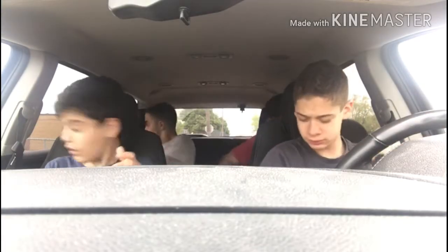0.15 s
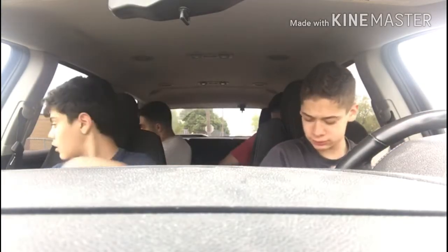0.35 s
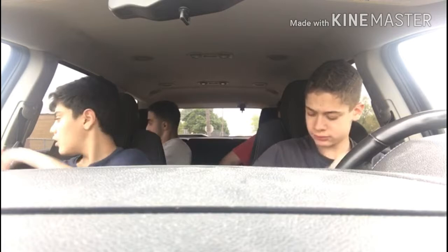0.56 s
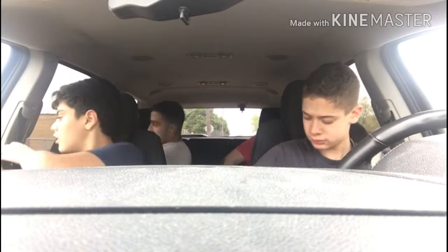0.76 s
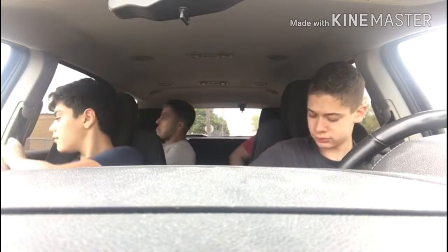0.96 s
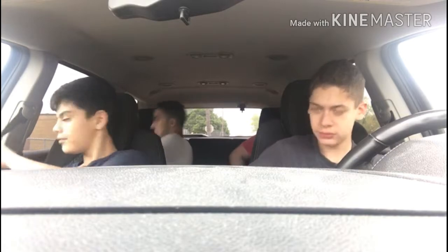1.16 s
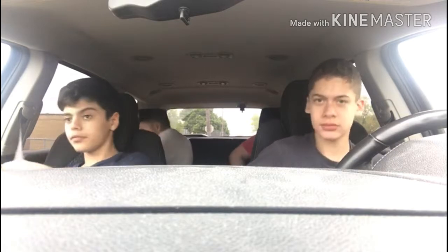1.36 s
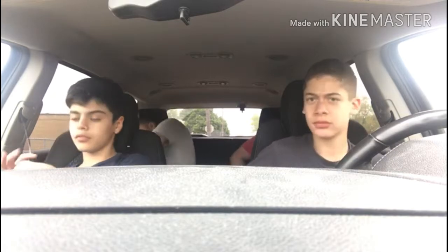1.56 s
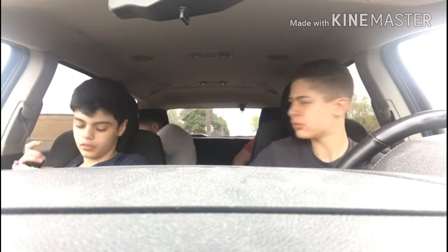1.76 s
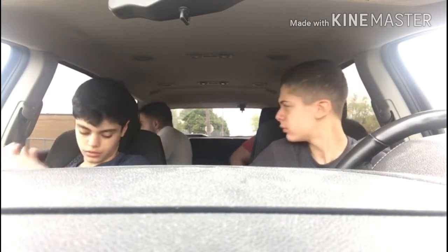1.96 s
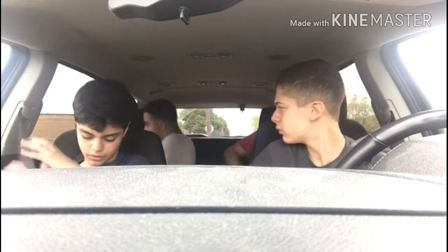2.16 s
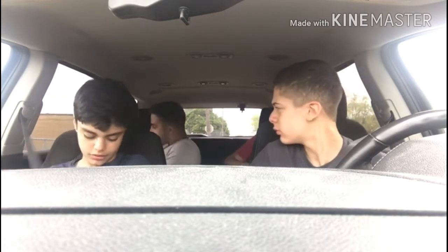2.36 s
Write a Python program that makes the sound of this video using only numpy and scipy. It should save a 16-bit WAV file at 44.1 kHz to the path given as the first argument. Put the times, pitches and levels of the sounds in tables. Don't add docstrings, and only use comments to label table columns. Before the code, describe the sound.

Soft blows on seats, door and trim thud inside a closed parked car, each followed by a low cabin boom; plastic taps, buckle ticks and a brief belt-reel creak cluster around them over faint traffic hum.

```python
import sys
import numpy as np
from scipy import signal
from scipy.fft import rfft, irfft, next_fast_len
from scipy.io import wavfile
from scipy.ndimage import map_coordinates

SR = 44100
rng = np.random.default_rng(int(sys.argv[2]) if len(sys.argv) > 2 else 0)


def nominal_scale(level):
    x = np.asarray(level, float) / 20
    return 10 ** x


def int16_out(signal):
    q = np.round(np.clip(np.atleast_2d(signal).T, -1, 1) * 32767)
    wavfile.write(sys.argv[1], SR, q.astype(np.int16))


N = 112455


def unit(x):
    return x / np.sqrt(np.mean(x ** 2) + 1e-20)


def noise(points, size):
    hz, db = np.transpose(points)
    m = next_fast_len(size + 8192)
    bins_hz = np.fft.rfftfreq(m, 1 / SR)
    gain = nominal_scale(np.interp(np.log(bins_hz + 1), np.log(hz + 1), db, left=-120, right=-120))
    return unit(irfft(rfft(rng.standard_normal(m)) * gain, m)[:size])


def around(hz, octaves):
    return [(hz * 2 ** (k * octaves), -7 * k * k) for k in range(-2, 3)]


def wobble(knots_per_s, size):
    knots = rng.standard_normal(size // 100 + 4)
    return map_coordinates(knots, [np.arange(size) * knots_per_s / SR])


def shape(t, rise_s, hold_s, t60_s):
    attack = (1 - np.exp(-t / rise_s)) ** 2
    return attack * nominal_scale(-60 * np.maximum(t - hold_s, 0) / t60_s)


def add(track, s, x):
    track[round(s * SR):][:len(x)] += x


# (time [s], level [dB])
TRAFFIC_LEVEL = [
    (0.0, -37.5),
    (0.5, -38),
    (0.97, -37.5),
    (1.3, -37),
    (1.45, -38.5),
    (1.73, -38),
    (2.02, -36.5),
    (2.55, -36),
]
# (frequency [Hz], density [dB per Hz])
RUMBLE_SPECTRUM = [(15, -61), (25, -3), (45, -1), (102, -4), (227, -13.5), (273, -11.5), (390, -16.5),
                   (462, -16.5), (581, -15.5), (750, -44.5), (980, -71), (1650, -120)]
HUM_SPECTRUM = [(410, -47.5), (700, -11.5), (780, -9), (845, 0), (1000, 0), (1090, -17), (1280, -15.5),
                (1680, -22), (2370, -22), (3200, -41.5), (4160, -67), (7040, -120)]
HISS_SPECTRUM = [(1650, -13), (2800, -0.5), (4210, -1.5), (4690, -5), (5530, -3), (7910, -6.5), (9090, -6),
                 (11200, -10.5), (12000, -13), (12200, -31), (15400, -33), (15600, -90)]
HUM_DB, HISS_DB, SWELL_DB = -54.5, -70.5, 1.5


def traffic():
    level_db = np.interp(np.arange(N) / SR, *np.transpose(TRAFFIC_LEVEL))
    rumble_db = level_db + SWELL_DB * wobble(10.21, N)
    hum_db = HUM_DB + 0.62 * (level_db - level_db.mean()) + 0.37 * wobble(6, N)
    hiss_db = HISS_DB + 0.37 * wobble(8.9, N)
    rumble = nominal_scale(rumble_db) * noise(RUMBLE_SPECTRUM, N)
    hum = nominal_scale(hum_db) * noise(HUM_SPECTRUM, N)
    hiss = nominal_scale(hiss_db) * noise(HISS_SPECTRUM, N)
    return rumble + hum + hiss


# (time [s], level [dB])
CREAK_LEVEL = [
    (1.05, -88),
    (1.075, -46),
    (1.09, -55),
    (1.105, -51),
    (1.12, -46),
    (1.145, -39),
    (1.174, -42.5),
    (1.187, -50),
    (1.2, -80),
]
# (frequency [Hz], width [Hz], level [dB])
REEL_MODES = [(970, 50, -4), (1430, 35, -11), (1853, 78, -2), (2130, 100, -5.5), (2430, 74, -8.5),
              (2830, 40, -13.5)]
SLIPS_PER_S, SLIP_SCATTER_DB = 2600, 2
REEL_TOP_HZ = 3000


def creak():
    t = np.arange(N) / SR
    happens = rng.random(N) < SLIPS_PER_S / SR
    scatter = nominal_scale(SLIP_SCATTER_DB * rng.standard_normal(N))
    level = nominal_scale(np.interp(t, *np.transpose(CREAK_LEVEL), left=-120, right=-120))
    slips = happens * scatter * level

    f = np.fft.rfftfreq(2 * N, 1 / SR)
    body = 0
    for k, (hz, width_hz, db) in enumerate(REEL_MODES):
        damping = 1j * f * width_hz
        body = body + (-1) ** k * nominal_scale(db) * damping / (hz * hz - f * f + damping)
    body = body / (1 + (f / REEL_TOP_HZ) ** 4)
    return 19 * irfft(rfft(slips, 2 * N) * body, 2 * N)[:N]


# (time [s], level [dB], centre [Hz], length [s])
TICK_EVENTS = [(.524, -56, 2000, .01), (.559, -62, 2450, .003), (.607, -65, 2400, .003),
               (1.055, -54, 1800, .008), (1.069, -53, 2400, .004), (1.097, -48, 2100, .006),
               (1.099, -65, 5400, .002), (1.071, -68, 4500, .002), (1.789, -52, 1800, .008),
               (1.84, -66, 2400, .01), (0.459, -69, 2300, 0.057), (2.085, -62.5, 2240, 0.0085),
               (1.259, -55.5, 1850, 0.013), (1.41, -60, 2500, 0.0067), (1.588, -56, 1940, 0.0052),
               (1.607, -66, 2500, 0.026), (1.683, -51, 1670, 0.015), (1.745, -55, 2700, 0.002),
               (1.745, -53, 1280, 0.008), (1.74, -63, 6500, 0.012), (1.716, -55, 1100, 0.011),
               (1.679, -64.5, 6370, .004), (2.156, -48, 1200, 0.015), (2.158, -50, 2070, 0.0061),
               (2.16, -75, 4180, 0.0079), (2.282, -59, 2400, 0.0079), (2.282, -63.5, 6000, 0.0038),
               (2.311, -50, 1490, 0.0038)]
TICK_OCTAVES, TICK_T60_S = 0.62, 0.049


def ticks():
    out, t = np.zeros(N + SR), np.arange(SR // 8) / SR
    for s, db, hz, length_s in TICK_EVENTS:
        scrape = noise(around(hz, TICK_OCTAVES), len(t))
        add(out, s, nominal_scale(db) * scrape * shape(t, 0.003, length_s, TICK_T60_S))
    return out[:N]


# (time [s], level [dB], pitch [Hz], contact [s]) further knocks, of the same kind as the plastic
FURTHER_KNOCKS = [
    (.02, -39, 560, .012),
    (.391, -37, 585, .016),
    (.481, -43, 560, .005),
    (.736, -36, 545, .014),
    (2.263, -39, 600, .012),
    (.855, -57, 1280, .016),
    (1.136, -41, 965, .016),
    (1.16, -46, 960, .008),
    (1.62, -63, 2750, .012),
    (1.783, -30, 210, .01),
]
BUCKLE_PINGS = [(.525, -63, 4250, .004), (0.631, -61, 1920, 0.0053), (1.344, -64.5, 4560, 0.0026),
                (1.424, -57.5, 1890, 0.0052), (1.749, -48.5, 1289, 0.017), (1.747, -55, 2700, .004),
                (1.747, -61.5, 4500, .006), (1.792, -67, 4390, .005), (1.997, -60, 1980, 0.0058),
                (1.997, -70.5, 4300, .005), (2.157, -62, 4050, 0.0093), (2.16, -65, 2625, 0.019),
                (2.065, -61.5, 1850, 0.01), (2.286, -62, 2450, .008)]
PLASTIC_TAPS = [(.535, -29, 150, .04), (1.07, -27, 150, .05), (1.8, -28, 145, .045), (.205, -24, 140, .03),
                (1.822, -30, 480, .018), (1.115, -40, 700, .02), (.548, -25, 520, 0.014),
                (.529, -25, 480, 0.012), (.262, -34, 568, 0.0092), (0.31, -29, 92.6, 0.016),
                (0.2545, -14.5, 135, 0.012), (0.42, -32, 62, 0.02), (1.67, -35, 55, .04),
                (2.151, -34, 336, 0.018), (1.105, -23, 537, 0.0082), (1.262, -24.5, 306, 0.017),
                (1.266, -29, 500, 0.014), (1.3, -39, 600, 0.024), (1.593, -40, 460, 0.0033),
                (1.692, -29.5, 550, 0.017), (1.763, -37, 570, 0.004), (.192, -36, 800, 0.006),
                (1.135, -35, 280, 0.04), (1.304, -33, 220, 0.021), (1.165, -30, 62, 0.035),
                (1.068, -20, 300.5, 0.015), (2.05, -25.5, 58, 0.014), (1.058, -26, 480, 0.024),
                (1.968, -36.5, 567, 0.0045), (2.151, -32, 555, 0.032), (2.172, -21.5, 54, 0.014)]
RATTLE_DB, RATTLE_OCTAVES = -6, 0.36
PARTNER_RATIO, PARTNER_DB = .9, -13
TAP_WANDER_RAD, TAP_RISE_CYCLES = .6, 0.7
TAP_T60_CYCLES, SHORTEST_T60_S, LONGEST_T60_S = 12, .03, 0.073


def taps():
    out, t = np.zeros(N + SR), np.arange(SR // 2) / SR
    for s, db, hz, contact_s in PLASTIC_TAPS + BUCKLE_PINGS + FURTHER_KNOCKS:
        phase = 2 * np.pi * hz * t
        main = np.sin(phase + TAP_WANDER_RAD * wobble(90, len(t)))
        partner = nominal_scale(PARTNER_DB) * np.sin(phase * PARTNER_RATIO)
        rattle = nominal_scale(RATTLE_DB) * noise(around(hz, RATTLE_OCTAVES), len(t))
        t60_s = np.clip(TAP_T60_CYCLES / hz, SHORTEST_T60_S, LONGEST_T60_S)
        envelope = shape(t, TAP_RISE_CYCLES / hz, contact_s, t60_s)
        add(out, s, nominal_scale(db) * (main + partner + rattle) * envelope)
    return out[:N]


BOOM_RISE_S = 0.017


def air_swell(t, hz, crest_s, t60_s):
    after_s = t - crest_s
    rise = np.exp(-(after_s / BOOM_RISE_S) ** 2 / 2) * np.minimum(t / .005, 1)
    envelope = np.where(t < crest_s, rise, nominal_scale(-60 * after_s / t60_s))
    return np.cos(2 * np.pi * hz * after_s) * envelope


# (time [s], knock [dB], boom [dB], slap [dB])
BLOWS = [
    (0.188, -13.5, -12.5, -40.5),
    (.5205, -20.5, -40, -46),
    (.5255, -25, -14, -44),
    (1.0559, -19, -15.5, -43),
    (1.0849, -20, -37, -44),
    (1.3424, -16, -14, -43),
    (1.7928, -20, -13, -44.5),
    (1.9942, -19.5, -16.5, -46.5),
    (2.2162, -19, -19.5, -50.5),
]
BLOW_SPOTS = ["seat", "door", "door", "trim", "sill", "seat", "pillar", "seat", "cushion"]
SPOT_PUSHES = {"seat": [-.95, -.7, 1.05, -.55, -.7, -1.1, -.55, -.3, .12], "cushion": [-1.1, -.7, 1, -.55,
               -.4, -.55, -.3, -.1, .1], "door": [-.25, -1, .5, .25, -.4, .5, -.5, .15, 0], "trim": [-1.1,
               -.8, .4, -.8, -1, -.65, -.1, -.35, -.1], "sill": [.2, .3, .4, -1, -.3, -.6, .2, .2, 0],
               "pillar": [1.2, .8, -.3, .5, .7, .5, -.2, -.2, .1]}
# (frequency [Hz], t60 [s])
PANEL_MODES = [(183, .025), (211, .078), (240.4, .18), (288, .058), (351, .086), (395, .025), (442.5, .084),
               (537, .092), (603, .025)]
# (frequency [Hz], density [dB per Hz])
TAIL_SPECTRUM = [(100, -31.5), (170, -4), (242, -7), (303, -12.5), (441, -11), (524, -20.5), (799, -36),
                 (1100, -47), (1430, -67), (2420, -120)]
SLAP_SPECTRUM = [(410, -46.5), (700, -1), (1170, -12.5), (2100, -21), (4370, -43.5), (5000, -60.5),
                 (7000, -58), (9100, -84.5), (15400, -120)]
CONTACT_S, PANEL_LAG_S, KNOCK_RISE_CYCLES = .0177, .00207, 1.14
MODE_SCATTER_DB, MODE_WANDER_RAD = .5, .08
TAIL_DB, TAIL_FLUTTER_DB, TAIL_RISE_S, TAIL_T60_S = -8.5, 2.5, 0.0062, .28
BOOM_HZ, BOOM_CREST_S, BOOM_T60_S = 55, .0455, 0.16
SWAY_HZ, SWAY_CREST_S, SWAY_T60_S, SWAY_DB = 95.2, .0445, 0.099, -7.5
SLAP_T60_S = 0.16
REBOUND_S, REBOUND_DB = 0.0766, -14


def panel_ring(t, spot):
    ring = np.zeros(len(t))
    for push, (hz, t60_s) in zip(SPOT_PUSHES[spot], PANEL_MODES):
        scatter = nominal_scale(MODE_SCATTER_DB * rng.standard_normal())
        phase = 2 * np.pi * hz * (t - PANEL_LAG_S) + MODE_WANDER_RAD * wobble(37, len(t))
        envelope = shape(t, KNOCK_RISE_CYCLES / hz, CONTACT_S, t60_s)
        ring += push * scatter * envelope * np.sin(phase)
    return ring


def thumps():
    out, t = np.zeros(N + SR), np.arange(SR // 2) / SR
    boom = air_swell(t, BOOM_HZ, BOOM_CREST_S, BOOM_T60_S)
    boom = boom + nominal_scale(SWAY_DB) * air_swell(t, SWAY_HZ, SWAY_CREST_S, SWAY_T60_S)
    for (s, knock_db, boom_db, slap_db), spot in zip(BLOWS, BLOW_SPOTS):
        ring = panel_ring(t, spot)
        flutter = nominal_scale(TAIL_DB + TAIL_FLUTTER_DB * wobble(50, len(t)))
        tail = flutter * noise(TAIL_SPECTRUM, len(t)) * shape(t, TAIL_RISE_S, CONTACT_S, TAIL_T60_S)
        slap = noise(SLAP_SPECTRUM, len(t)) * shape(t, 0.0016, .008, SLAP_T60_S)
        add(out, s, nominal_scale(knock_db) * (ring + tail))
        add(out, s, nominal_scale(boom_db) * boom)
        add(out, s, nominal_scale(slap_db) * slap)
        add(out, s + REBOUND_S, nominal_scale(boom_db + REBOUND_DB) * boom)
    return out[:N]


def scene():
    return (traffic() + creak() + ticks() + taps() + thumps())[None]


def low_pass(x):
    return signal.sosfilt(signal.butter(12, 12100, fs=SR, output="sos"), x)


MIC_LOW_HZ = 35.2
LIMIT, KNEE = 0.96, 2.5


def record(dry):
    low_cut = signal.butter(2, MIC_LOW_HZ, "high", fs=SR, output="sos")
    x = signal.sosfiltfilt(low_cut, dry)
    mix = x / (1 + np.abs(x / LIMIT) ** KNEE) ** (1 / KNEE)
    return low_pass(mix)


dry = scene()
out = record(dry)
int16_out(out)
```